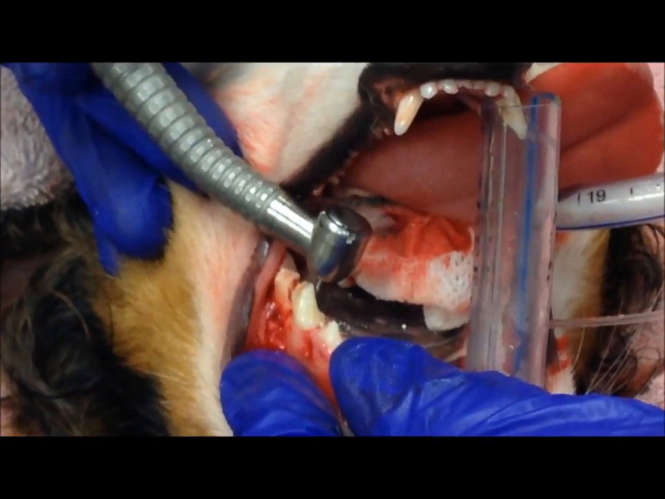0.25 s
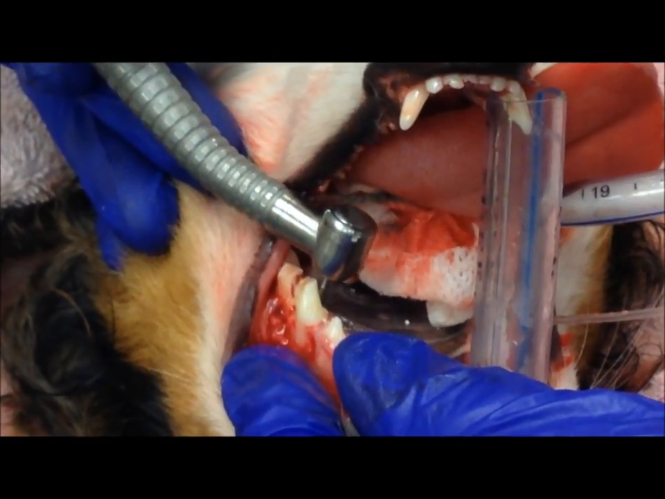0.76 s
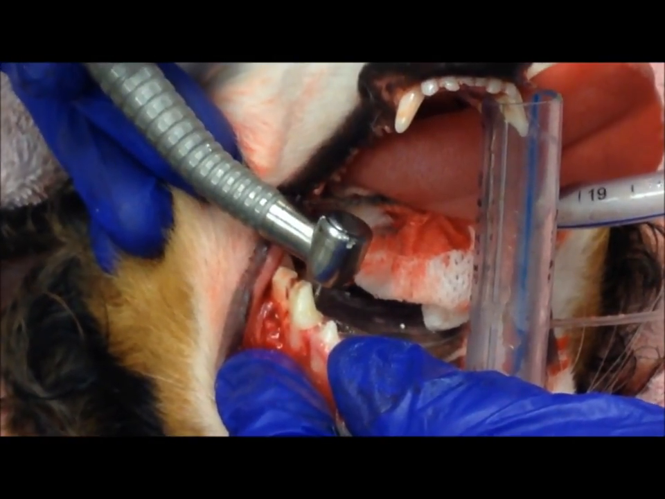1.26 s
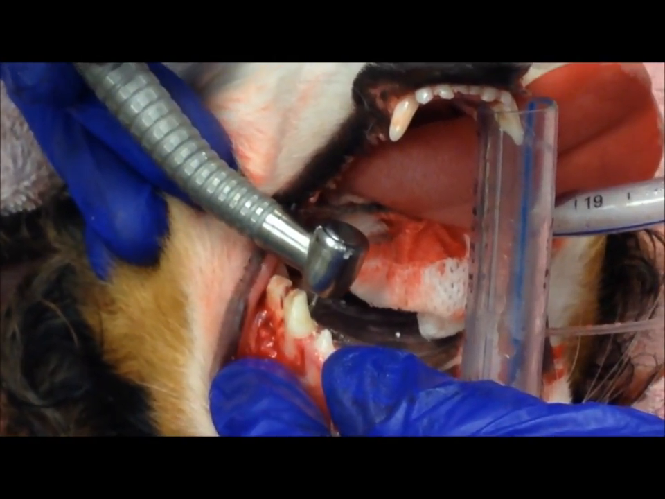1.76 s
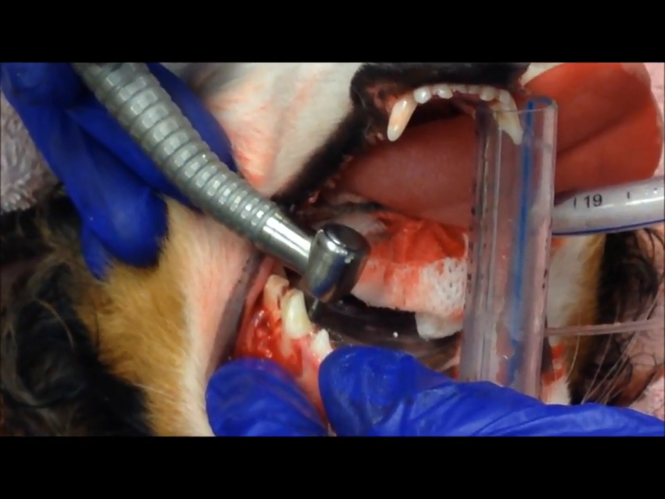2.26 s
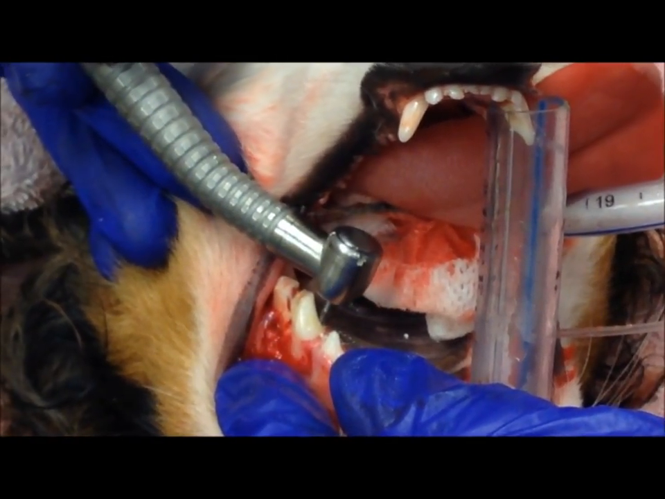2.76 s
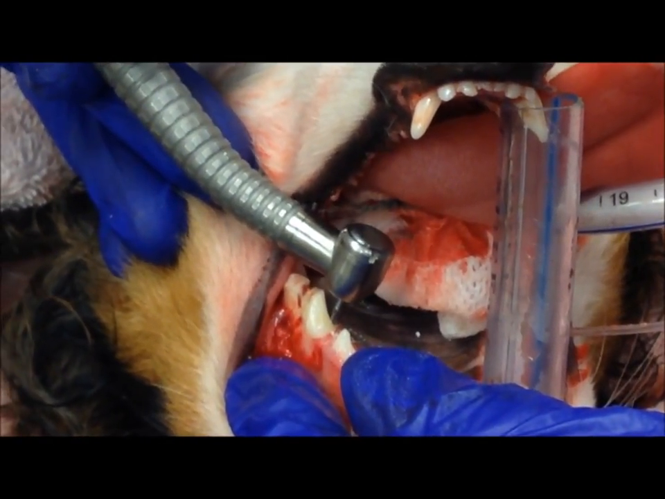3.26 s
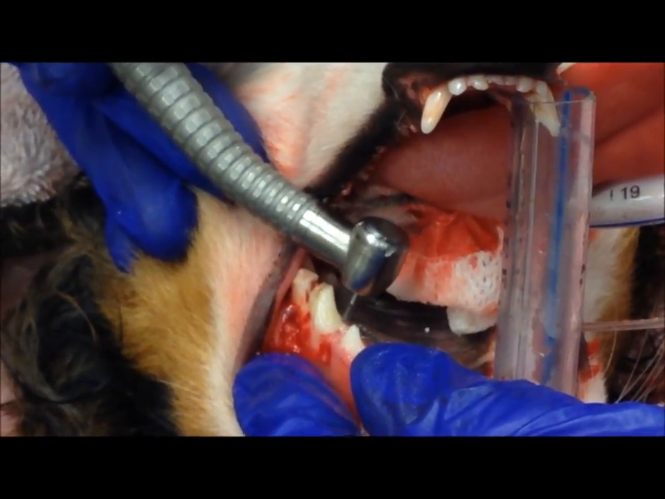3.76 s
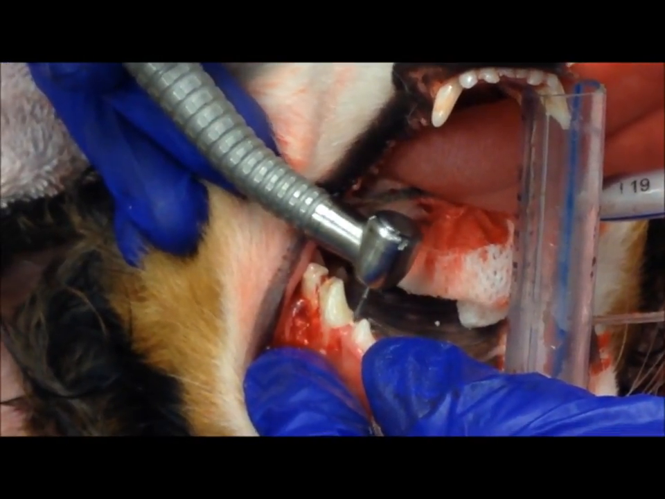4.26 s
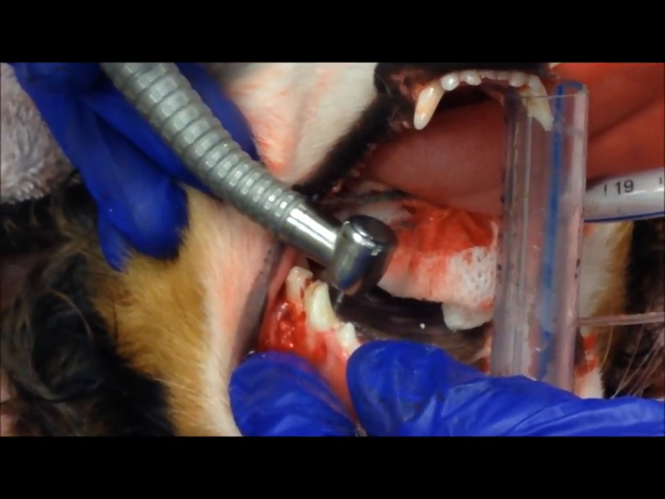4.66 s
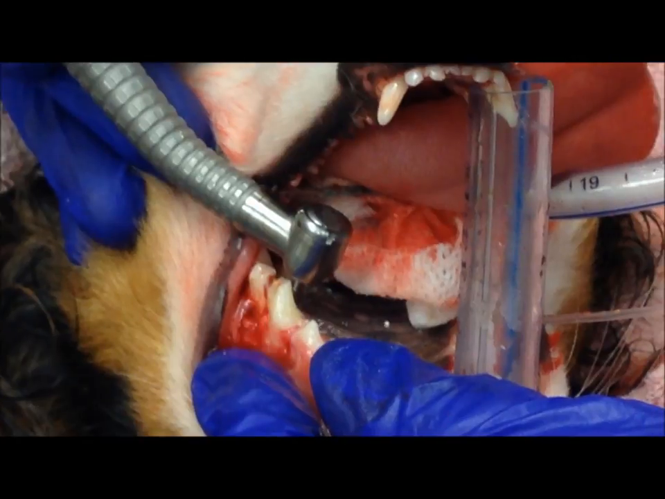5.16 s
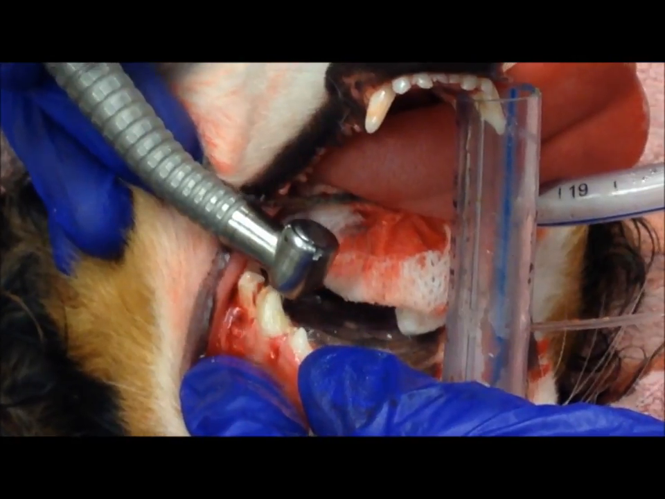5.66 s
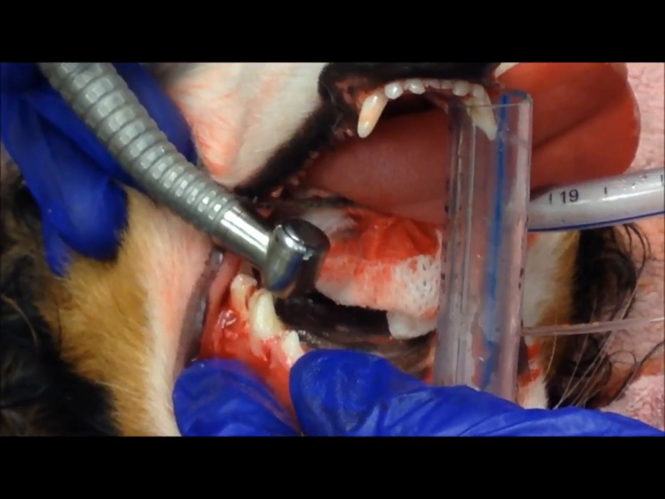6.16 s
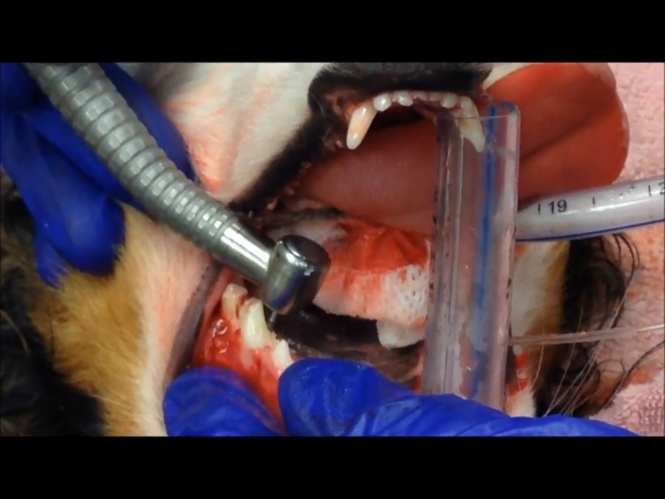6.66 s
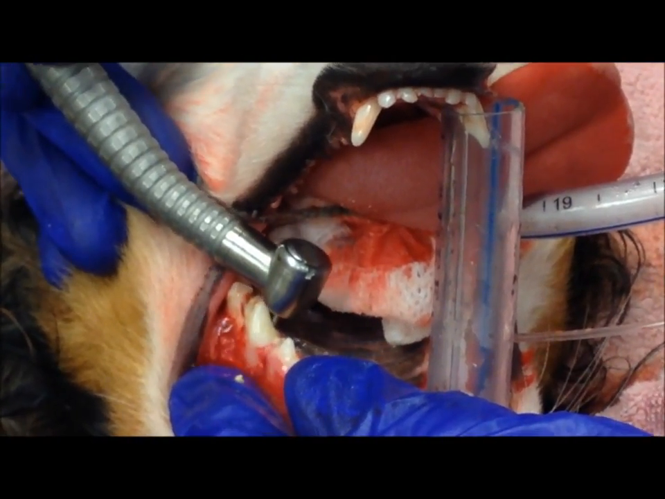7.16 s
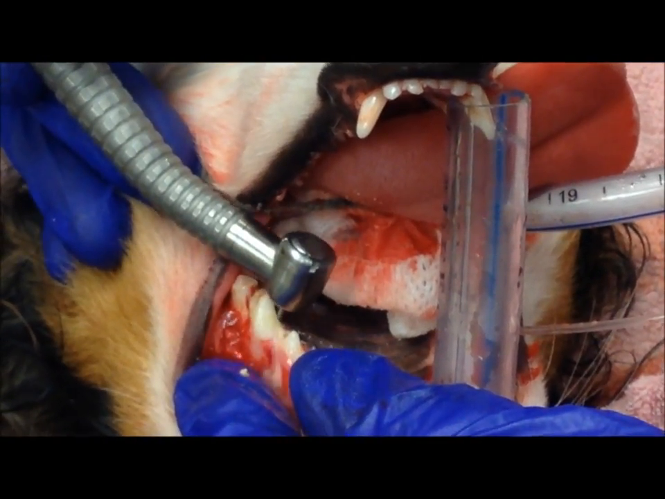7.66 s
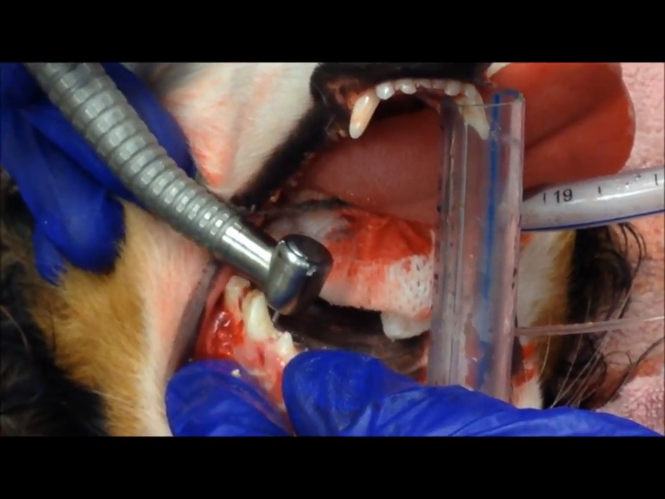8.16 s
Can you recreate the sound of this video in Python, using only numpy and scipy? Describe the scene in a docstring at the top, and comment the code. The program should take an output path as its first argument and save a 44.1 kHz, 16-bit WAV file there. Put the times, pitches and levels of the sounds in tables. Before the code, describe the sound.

A dental drill runs close to the microphone in a quiet clinic, already whining loudly and very high. From 0.3 s it sags as the bur bites, bottoms near 0.7, climbs back by 1.0, dips around 1.5 and recovers at 1.8, with a faint rattling knock at 1.75. It sinks deeper at 2.2, then wavers at middling pitch, peaking at 3.4. Around 4.0-4.5 it runs free and high, with brief squealing side tones, then slowly drops. At 5.7 it plunges, almost stalling near 6.0 at a much lower whine, and shoots up by 6.3. Another deep sag follows at 6.7, high peaks with short squeals at 7.1 and 7.7, dips at 7.4 and 8.1, and a last rise before it cuts off falling at 8.4. Gritty, sizzling grinding swells under load, strongest near 7.1; air and spray hiss throughout, thinning as it slows. Bearing rumble-tone, low hum and ventilation stay faint.

```python
"""Air-turbine dental drill cutting a tooth

Heard close by a mono microphone with gain control. The rotor whines at its turning rate and overtones
and slows as the bur bites; brief side tones split the whine. The bur grinds as bands of noise, the
bearing cage hums below as a rough tone, drive air and spray hiss as noise ringing in the handpiece.
Faint clinic noise, machine hums and one rattling knock lie behind."""
import sys
import numpy as np
from scipy import signal
from scipy.fft import rfft, irfft
from scipy.io import wavfile
from scipy.ndimage import uniform_filter1d

SR = 44100
rng = np.random.default_rng(int(sys.argv[2]) if len(sys.argv) > 2 else 0)


def transcribe(u):
    """Save the signal u as a 16-bit wav file named by the first command-line argument.

    u: samples, shape (n,) or (channels, n), limited to [-1, 1]; the rate is SR.
    q: integer samples, one column per channel.
    """
    v = np.clip(np.atleast_2d(u).T, -1, 1)
    q = np.round(v * 32767).astype(np.int16)
    wavfile.write(sys.argv[1], SR, q)


N = 370440   # samples


def from_db(db):
    """Decibels to gain."""
    return 10 ** (np.asarray(db) / 20)


def rms_one(x):
    """Scaled to rms 1."""
    return x / np.sqrt(np.mean(x ** 2) + 1e-20)


def in_time(rows):
    """Each column of a table, joined by straight lines at every sample."""
    s, *columns = np.transpose(rows)
    return [np.interp(np.arange(N) / SR, s, c) for c in columns]


def at_speed(rows, speed_hz):
    """Each column of a table read at the rotor's speed."""
    hz, *columns = np.transpose(rows)
    return [np.interp(speed_hz, hz, c) for c in columns]


def drift(rate_hz):
    """Slow chance: noise at every 10th sample through a double one-pole low-pass; spread 1."""
    pole = np.exp(-20 * np.pi * rate_hz / SR)
    noise = rng.standard_normal(N // 10 + 4002)
    slow = signal.lfilter([1], [1, -2 * pole, pole * pole], noise)[4000:]   # settled part
    return np.interp(np.arange(N) / 10, np.arange(len(slow)), rms_one(slow - slow.mean()))


def coloured(spectrum, patchy_db):
    """Noise with a given spectrum, in half-octave bands that each flicker; rms 1."""
    hz = np.maximum(np.arange(N // 2 + 1) * SR / N, 1)
    point_hz, point_db = np.array(spectrum, float).T
    shape_db = np.interp(np.log(hz), np.log(point_hz), point_db, -90, -90)
    noise = rfft(rng.standard_normal(N)) * from_db(shape_db)
    band = np.floor(2 * np.log2(hz))
    together = drift(6)
    out = np.zeros(N)
    for k in np.unique(band[(hz > point_hz[0]) & (hz < point_hz[-1])]):
        flicker_db = patchy_db * (0.15 * together + drift(13.7))
        out += irfft(noise * (band == k), N) * from_db(flicker_db)
    return rms_one(out)


def tone(turns, level_db, flutter_db, jitter_rad):
    """A sine of rms level_db whose level flutters and whose phase jitters."""
    phase = 2 * np.pi * (turns + rng.random()) + jitter_rad * drift(230)
    return np.sqrt(2) * from_db(level_db + flutter_db * drift(73)) * np.sin(phase)


def cavity(x, hz, width_hz):
    """One two-pole resonance, gain 1 on top."""
    r, w = np.exp(-np.pi * width_hz / SR), 2 * np.pi * hz / SR
    return signal.lfilter([(1 - r * r) / 2, 0, (r * r - 1) / 2], [1, -2 * r * np.cos(w), r * r], x)


# ventilation spectrum: (frequency [Hz], relative density [dB])
VENTILATION = [(16, -19), (40, -4), (300, -0.5), (450, -3), (600, -9.5), (900, -6.5), (1400, -3),
               (2000, -2.5)]
VENTILATION_DB = -49


def ventilation():
    """Low-passed broadband noise with flickering bands."""
    return from_db(VENTILATION_DB) * coloured(VENTILATION, patchy_db=2.5)


# machines: (frequency [Hz], level [dB], waver [dB])
MACHINE_HUMS = [(59.3, -68, 2.0), (118.5, -65, 2.0), (213, -47.5, .7), (904, -66, 1.5)]


def machine_hums():
    """Steady sines wavering in level and phase."""
    t, out = np.arange(N) / SR, np.zeros(N)
    for hz, level_db, waver_db in MACHINE_HUMS:
        wavering_db = level_db + waver_db * drift(5.7)
        phase = 2 * np.pi * hz * t + 0.31 * drift(8.7)
        out += np.sqrt(2) * from_db(wavering_db) * np.sin(phase)
    return out


# small object knocks and rattles: (time [s], strength [dB])
KNOCK_HITS = [(1.743, -23), (1.751, -31), (1.762, -31)]
# its modes: (frequency [Hz], relative level [dB], 60 dB decay [s])
OBJECT_MODES = [(351, -7, 0.083), (1210, -13, 0.11), (1600, -3, 0.077), (1850, 9, 0.011)]
MODES_TRIM_DB, KNOCK_TAIL_S = -6.5, .3


def knock():
    """Each hit rings the object's modes as decaying sines."""
    t, out = np.arange(N) / SR, np.zeros(N)
    for s, strength_db in KNOCK_HITS:
        after_s = np.maximum(t - s, 0)[:round((s + KNOCK_TAIL_S) * SR)]
        for hz, mode_db, t60_s in OBJECT_MODES:
            ring_db = strength_db + mode_db + MODES_TRIM_DB - 60 * after_s / t60_s
            out[:len(after_s)] += from_db(ring_db) * np.sin(2 * np.pi * hz * after_s)
    return out


# drive air and spray: (frequency [Hz], relative density [dB])
AIR_SPECTRUM = [(600, -36), (1200, -22), (1700, -16.5), (2400, -8), (3200, -12), (4200, -6), (5000, -2),
                (6200, -6), (8000, -5.5), (11000, -4), (15600, -7)]
# handpiece: (frequency [Hz], width [Hz], cage boost [dB], air ring [dB]); also read by cage()
HANDPIECE_CAVITIES = [(1985, 120, 9, -44), (2643, 260, 10, -45.5), (3670, 340, -10, -40)]
AIR_DB, AIR_REF_HZ, AIR_DB_PER_OCTAVE = -28.5, 6000, 2.1   # levels at the reference rotor speed


def air(speed_hz):
    """Broad hiss that rings in the cavities and sinks as the rotor slows."""
    out = from_db(AIR_DB) * coloured(AIR_SPECTRUM, patchy_db=1.23)
    for hz, width_hz, _, ring_db in HANDPIECE_CAVITIES:
        wavering_db = ring_db + 1.2 * drift(3)
        out += from_db(wavering_db) * rms_one(cavity(rng.standard_normal(N), hz, width_hz))
    return out * from_db(AIR_DB_PER_OCTAVE * np.log2(speed_hz / AIR_REF_HZ))


# bearing cage at steady speed, before cavities: (rotor speed [Hz], level [dB])
CAGE_TONE = [(2200, -72), (3000, -60), (4000, -57), (5200, -53), (6300, -55), (7100, -50)]
CAGE_RATIO = .376   # cage turns per rotor turn
CAGE_RUSH_DB = 3   # louder per 10 kHz/s of change in speed


def cage(speed_hz, turns):
    """A rough tone below the whine; it swells where it crosses a cavity resonance."""
    cage_db, = at_speed(CAGE_TONE, speed_hz)
    rush = uniform_filter1d(np.abs(np.gradient(speed_hz)) * SR / 10000, size=2000)
    rattle = tone(CAGE_RATIO * turns, cage_db + CAGE_RUSH_DB * rush, flutter_db=2.5, jitter_rad=.7)
    out = rattle.copy()
    for hz, width_hz, boost_db, _ in HANDPIECE_CAVITIES:
        out += from_db(boost_db) * cavity(rattle, hz, width_hz)
    return out


# grinding swells and dips: (time [s], rasp gain [dB], overtone gain [dB])
GRIND_SWELLS = [(.66, -0.5, -4), (1.42, 5, 0), (2.1, 2.5, 1), (5.27, -0.5, 10), (5.7, 0, 3), (5.84, 3, 1.5),
                (6.14, 0, 4), (6.51, 5.5, 9), (6.84, 0, 2), (7.06, 9, -2), (7.36, 3.5, 3), (7.53, -0.5, 4),
                (7.91, 2.5, -2)]
SWELL_SIGMA_S = 0.079


def grind_swells():
    """Rasp and overtone gains in dB, following a bell curve at each swell or dip."""
    t = np.arange(N) / SR
    return sum(np.outer(gains_db, np.exp(-.5 * ((t - s) / SWELL_SIGMA_S) ** 2))
               for s, *gains_db in GRIND_SWELLS)


# grinding: (frequency [Hz], relative density [dB])
RASP_SPECTRUM = [(4000, -11.5), (6000, -2.5), (8000, 6), (9300, 1.5), (10200, -30)]
# its upper band: (frequency [Hz], relative density [dB])
SIZZLE_SPECTRUM = [(9000, -49), (10500, -20), (12500, -18.5), (14000, -20), (15600, -21)]
RASP_IDLE_DB, RASP_FULL_DB = -37.5, -27   # at load 0 and 1, before swells
SIZZLE_OVER_RASP_DB, SIZZLE_LOAD_DB = 1, .5


def cut(load, rasp_gain_db):
    """Bur grinding enamel: two noise bands that grow with load."""
    rasp_db = RASP_IDLE_DB + (RASP_FULL_DB - RASP_IDLE_DB) * load + rasp_gain_db
    sizzle_db = rasp_db + SIZZLE_OVER_RASP_DB + SIZZLE_LOAD_DB * load
    rasp = from_db(rasp_db) * coloured(RASP_SPECTRUM, patchy_db=2.0)
    return rasp + from_db(sizzle_db) * coloured(SIZZLE_SPECTRUM, patchy_db=2.0)


# bur whirls: (start [s], end [s], whirl at start [per turn], whirl at end [per turn],
#              upper squeal [dB], other tones [dB])
BUR_WHIRLS = [(4.03, 4.192, .36, .4, -33, -29), (4.34, 4.45, .385, .375, -37, -45),
              (7.04, 7.088, .268, .268, -18.5, -30.5), (7.684, 7.741, .28, .28, -16.5, -32)]
WHIRL_FADE_S = 0.011


def whirls(speed_hz, turns):
    """Side tones at first and second order plus or minus the whirl rate."""
    t, out = np.arange(N) / SR, np.zeros(N)
    for start_s, end_s, first, last, squeal_db, others_db in BUR_WHIRLS:
        gate = np.clip(np.minimum(t - start_s, end_s - t) / WHIRL_FADE_S, 0, 1)
        whirl = np.cumsum(np.interp(t, [start_s, end_s], [first, last]) * speed_hz) / SR
        out += gate * tone(turns + whirl, squeal_db, 1.1, 0.17)
        for side, side_db in [(turns - whirl, -8), (2 * turns - whirl, 0), (2 * turns + whirl, -2)]:
            out += gate * tone(side, others_db + side_db, 1.4, .2)
    return out


# rotor speed before enamel tugs: (time [s], speed [Hz])
ROTOR_SPEED = [(0, 7093), (.26, 7150), (.35, 6720), (.49, 5960), (.65, 4990), (.72, 4870), (.81, 5035),
               (.9, 6070), (1.015, 6680), (1.17, 6345), (1.29, 6320), (1.45, 5560), (1.55, 5380),
               (1.69, 6460), (1.81, 6740), (1.96, 6080), (2.14, 4690), (2.22, 4447), (2.36, 4883),
               (2.4, 5400), (2.45, 5680), (2.66, 6080), (2.8, 5420), (2.85, 5460), (2.89, 5350),
               (2.93, 5420), (2.98, 5320), (3.06, 5705), (3.19, 5565), (3.29, 5960), (3.41, 6660),
               (3.55, 5900), (3.68, 5403), (3.77, 5410), (3.87, 5170), (3.95, 5800), (4.06, 6680),
               (4.3, 7150), (4.52, 6674), (4.63, 6760), (4.78, 6522), (4.93, 6170), (5.12, 5364),
               (5.28, 5100), (5.4, 4985), (5.5, 5520), (5.62, 5136), (5.76, 4213), (5.84, 3100),
               (5.915, 2070), (5.96, 1882), (6.015, 1850), (6.045, 1767), (6.08, 1903), (6.125, 3100),
               (6.17, 4254), (6.22, 4990), (6.31, 5620), (6.43, 5635), (6.5, 5010), (6.605, 3660),
               (6.65, 3474), (6.7, 3243), (6.79, 3330), (6.88, 4800), (6.95, 5590), (7.11, 6420),
               (7.18, 6250), (7.35, 4820), (7.44, 4570), (7.55, 5055), (7.66, 6140), (7.79, 6590),
               (7.85, 6350), (7.965, 5160), (8.07, 4740), (8.125, 5010), (8.16, 5540), (8.23, 6120),
               (8.29, 6330), (8.4, 5270)]


def spin():
    """Rotor speed through the points, levelling off at each turn without overshoot."""
    s, v = np.transpose(ROTOR_SPEED)
    slope = np.diff(v) / np.diff(s)
    before, after = slope[:-1], slope[1:]
    both = before * after
    inner = np.where(both > 0, 2 * both / (before + after + 1e-9), 0)   # harmonic mean; 0 at a turn
    knee = np.r_[slope[0], inner, slope[-1]]
    t = np.clip(np.arange(N) / SR, s[0], s[-1])
    k = np.clip(np.searchsorted(s, t) - 1, 0, len(s) - 2)
    step = s[k + 1] - s[k]
    u = (t - s[k]) / step
    bow = (1 - u) * (knee[k] - slope[k]) - u * (knee[k + 1] - slope[k])
    return v[k] + step * u * (slope[k] + (1 - u) * bow)


FREE_HZ, SPIN_UP_S = 7294, 0.0618   # unloaded speed, rotor time constant
DRAG_SCALE_HZ = 2476   # drag giving load tanh(1)


def press(speed_hz):
    """Load 0-1: the bur's drag is the speed lost plus the slowing; it saturates."""
    slowing = uniform_filter1d(-np.gradient(speed_hz) * SR, size=2000, mode="nearest")
    drag_hz = np.maximum(FREE_HZ - speed_hz + SPIN_UP_S * slowing, 0)
    return np.tanh(drag_hz / DRAG_SCALE_HZ)


# bur skips and blurs the whine: (time [s], judder strength [about rad of phase jitter])
BUR_JUDDERS = [(.42, 1.3), (.55, 1.5), (2.37, 1.3), (3.43, 1.1), (3.92, 1.2), (4.93, 1.2), (5.82, 1.2),
               (7.5, 1.1), (8.15, 1.6)]
JUDDER_SIGMA_S = .014


def judders():
    """Judder strength, a short bell curve at each skip."""
    t = np.arange(N) / SR
    return sum(strength * np.exp(-.5 * ((t - s) / JUDDER_SIGMA_S) ** 2) for s, strength in BUR_JUDDERS)


# rotor unbalance, before swells: (rotor speed [Hz], first order [dB], second order [dB])
UNBALANCE = [(1800, -48, -36), (2020, -37.5, -42), (2637, -50, -51), (3100, -33.5, -28.5), (3470, -24, -31),
             (3838, -29.5, -24.5), (4531, -26.5, -31.5), (5400, -23.5, -26), (5550, -27.5, -26),
             (6250, -22, -28.5), (6840, -17, -21.5), (7150, -21, -29)]
# whine swells and fades: (time [s], first order gain [dB], second order gain [dB])
WHINE_SWELLS = [(0, 10, 3.5), (.22, 7, -8), (.5, -2.5, 1), (.82, 0, 3), (.87, -1.5, 0), (1.0, 1, 1.5),
                (1.201, 0, -7), (1.56, 1.5, 7), (1.61, -2, -1), (1.8, 4, 0), (1.95, -2.5, -3),
                (2.4, 1.5, 4.5), (2.57, -6, 0), (2.66, -2, -5), (2.9, 1, 5), (3.25, -0.5, -1.5),
                (3.41, 3.5, 2.5), (3.6, -1.5, 0), (3.77, 5, 5.5), (3.93, -4.5, -9.5), (4.15, 9.5, 6.5),
                (4.6, 2, -12), (4.88, -5, -11), (5.2, 1, -3), (5.38, -3, -9), (5.54, 2, -7), (5.66, -9, -3),
                (5.8, 1.5, 2.5), (6.2, -0.5, -4.5), (6.42, 0, 1), (6.6, -7.5, 5.5), (6.78, -6, -1.5),
                (6.85, 1.5, -0.5), (7.1, 3.5, -3.5), (7.3, -6.5, 6), (7.6, -1.5, -8), (7.76, 1, 3),
                (8.05, -7.5, -6), (8.21, 3, 1.5), (8.4, -1, 0)]
# overtones of the cut: (order [per turn], relative level [dB])
CUT_OVERTONES = [(3, 0), (4, -2), (5, 3.5), (6, 7), (7, 5.5)]
BLADES, BLADE_DB = 8.14, -13.5   # turbine buckets passing the air jet, per turn
WAVER_DB, WAVER_HZ = (1.5, 2.5), 7   # first and second order
BITE_IDLE_DB, BITE_FULL_DB = -54, -28.5   # overtone base at load 0 and 1
STALL_HZ, STALL_LOSS_DB = 3000, 13   # overtones weaken below; full loss at half this speed


def rotor(speed_hz, turns, load, bite_gain_db):
    """Orders of the turning rate; load and judders roughen them."""
    order_db = [own + swell + waver * drift(WAVER_HZ) for own, swell, waver
                in zip(at_speed(UNBALANCE, speed_hz), in_time(WHINE_SWELLS), WAVER_DB)]
    first_db, second_db = order_db
    judder = judders()
    out = tone(turns, first_db - 5 * judder, .6 + 1.8 * load, .06 + .2 * load + .9 * judder)
    out += tone(2 * turns, second_db, 1.5 + 1.5 * load, .12 + .3 * load + judder)

    stall = np.clip(2 - 2 * speed_hz / STALL_HZ, 0, 1)
    bite_db = BITE_IDLE_DB + (BITE_FULL_DB - BITE_IDLE_DB) * load - STALL_LOSS_DB * stall + bite_gain_db
    parts = [(order, bite_db + rel_db, 3.5) for order, rel_db in CUT_OVERTONES]
    parts.append((BLADES, BLADE_DB, 1.5))
    for order, level_db, flutter_db in parts:
        audible = np.clip((19000 - order * speed_hz) / 1000, 0, 1)   # fades out from 18 to 19 kHz
        out += audible * tone(order * turns, level_db, flutter_db, .25 + .45 * load + judder)
    return out


def scene():
    """Drill, cut, air and clinic, the same on both sides."""
    speed_hz = spin()
    load = press(speed_hz)
    rasp_gain_db, bite_gain_db = grind_swells()
    speed_hz = speed_hz * (1 + .0045 * load * drift(14))   # uneven enamel tugs at the bur
    turns = np.cumsum(speed_hz) / SR
    mono = cut(load, rasp_gain_db)
    mono += rotor(speed_hz, turns, load, bite_gain_db)
    mono += cage(speed_hz, turns) + whirls(speed_hz, turns) + air(speed_hz)
    mono += ventilation() + machine_hums() + knock()
    return np.array([mono, mono])


GAIN_S, THRESHOLD_DB, GAIN_SLOPE = .3, -22, -.4   # slope in dB per dB over threshold
CUTOFF_HZ = 15280


def record(dry):
    """Slow gain control turns loud passages down; an elliptic low-pass cuts the top."""
    r = np.exp(-1 / (GAIN_S * SR))
    start_power = np.mean(dry[0, :SR // 5] ** 2)
    power = signal.lfilter([1 - r], [1, -r], dry[0] ** 2, zi=[start_power])[0]
    gain_db = GAIN_SLOPE * np.maximum(10 * np.log10(power + 1e-12) - THRESHOLD_DB, 0)
    low_pass = signal.ellip(10, .5, 60, CUTOFF_HZ, fs=SR, output="sos")
    return signal.sosfilt(low_pass, dry * from_db(gain_db))


dry = scene()
out = record(dry)
transcribe(out)
```